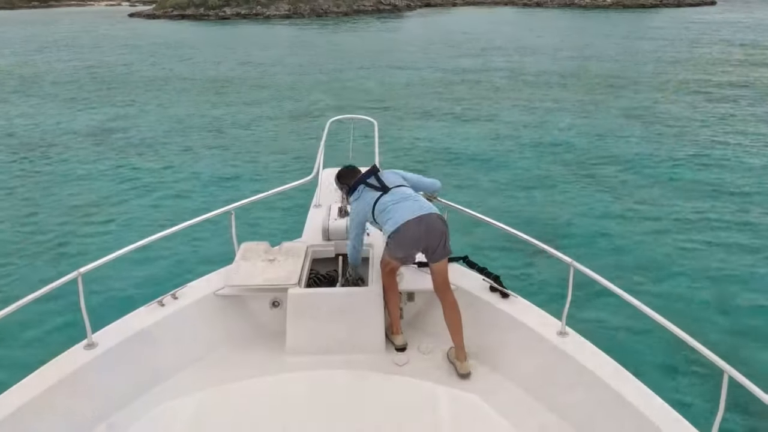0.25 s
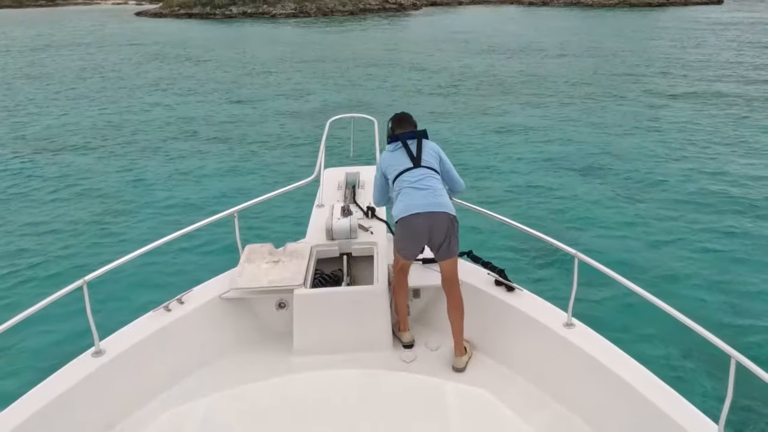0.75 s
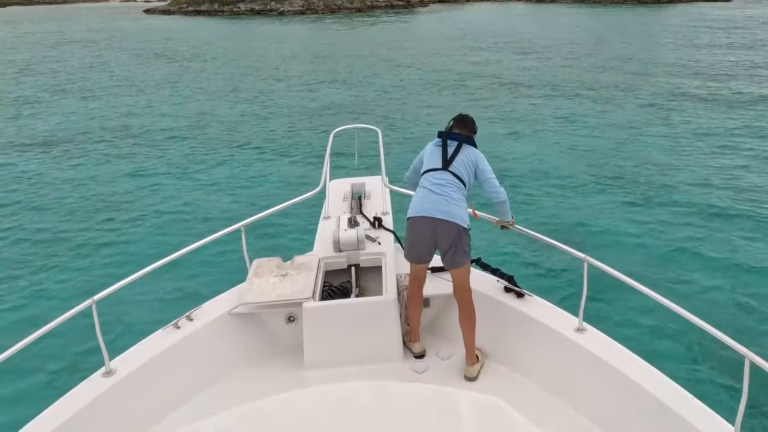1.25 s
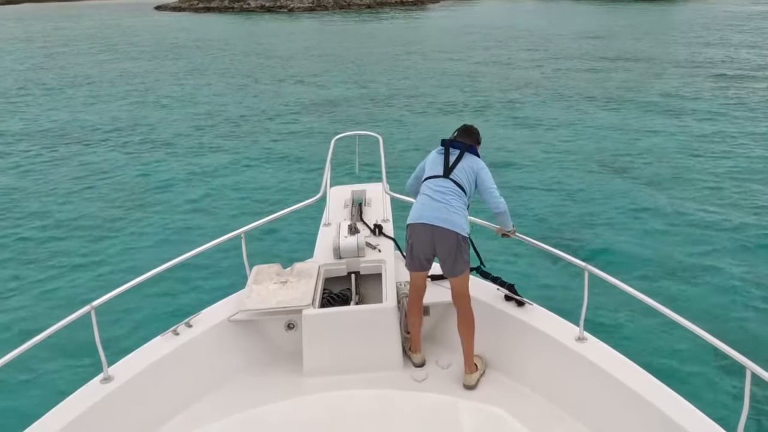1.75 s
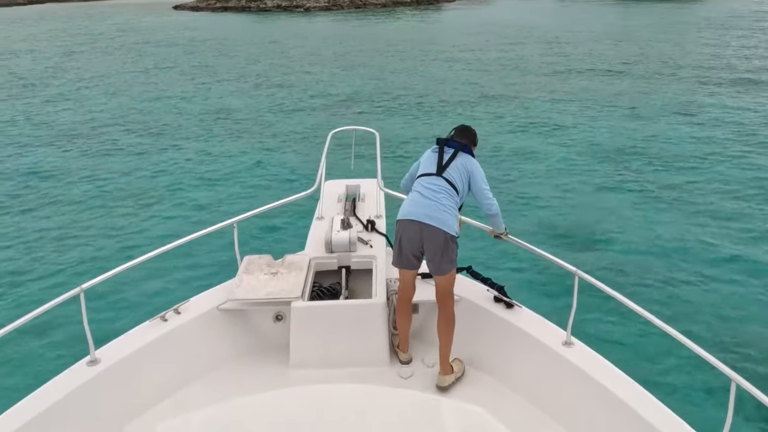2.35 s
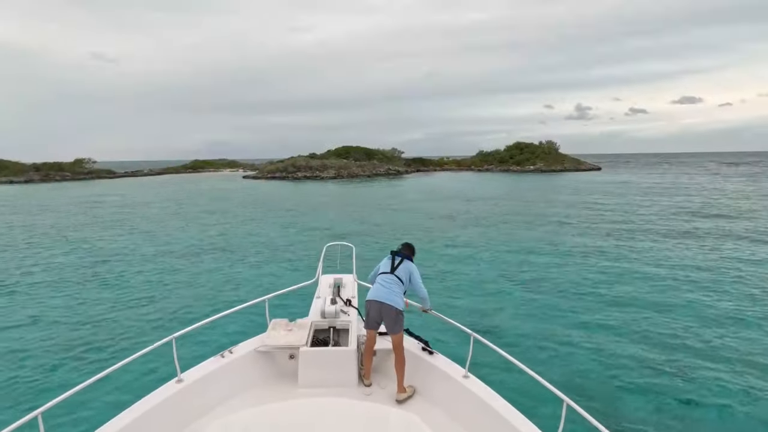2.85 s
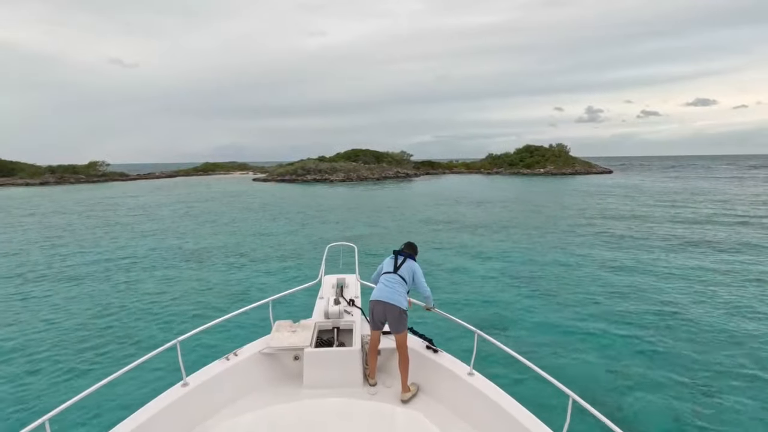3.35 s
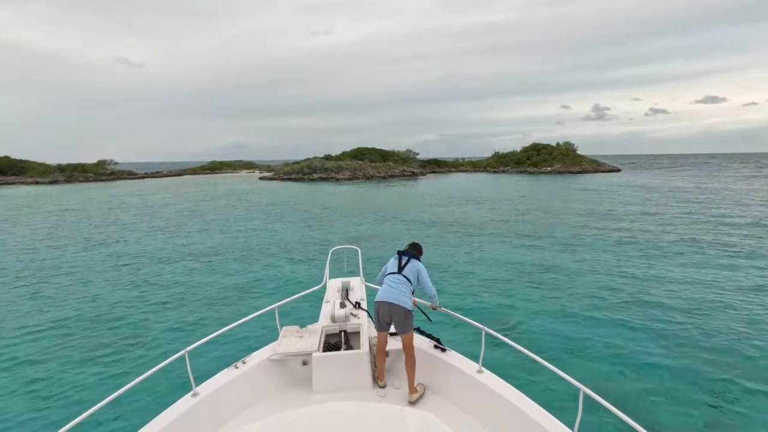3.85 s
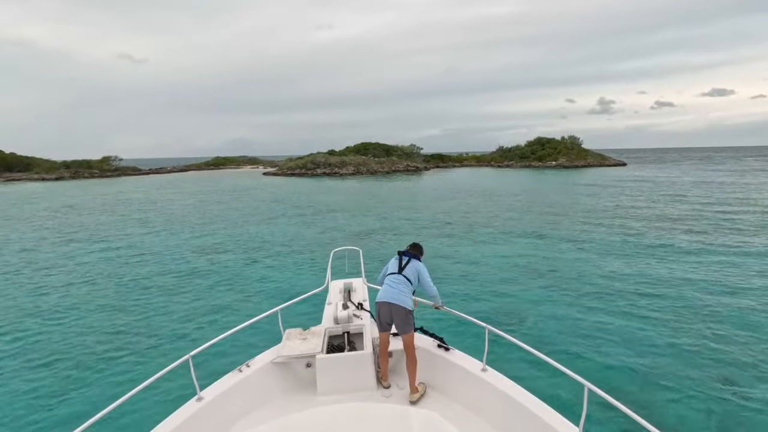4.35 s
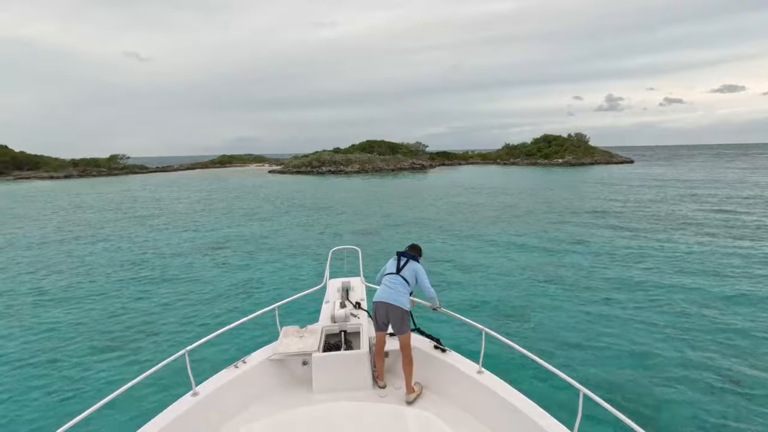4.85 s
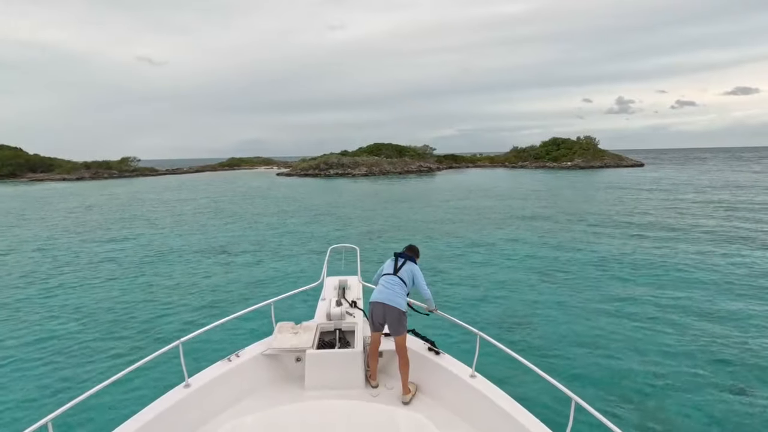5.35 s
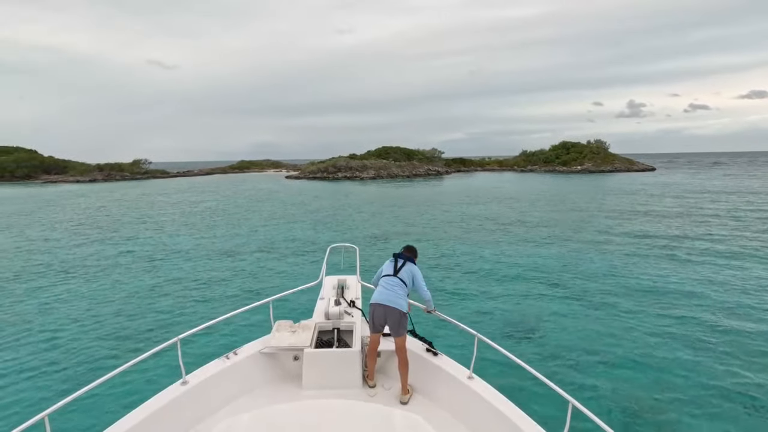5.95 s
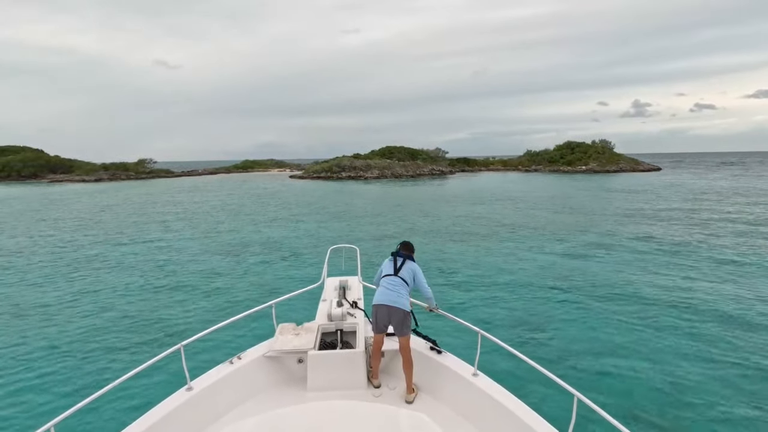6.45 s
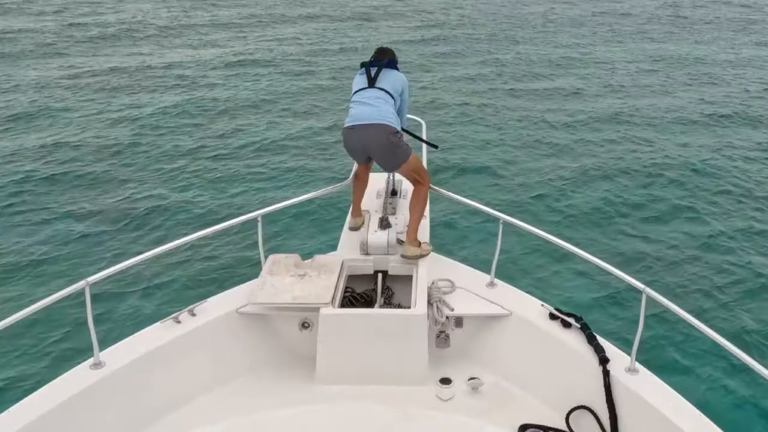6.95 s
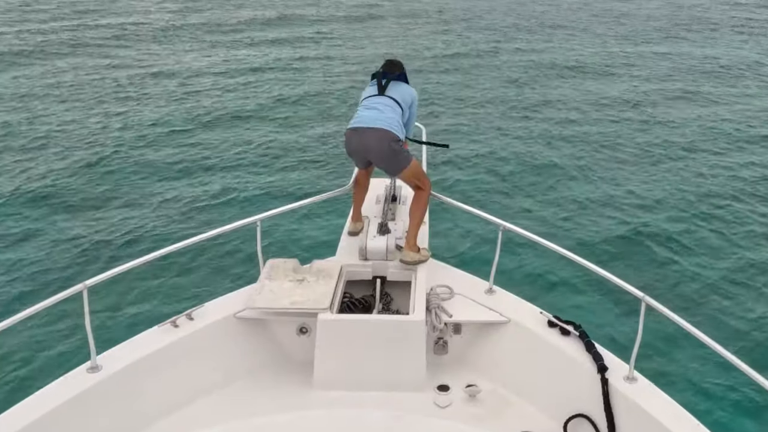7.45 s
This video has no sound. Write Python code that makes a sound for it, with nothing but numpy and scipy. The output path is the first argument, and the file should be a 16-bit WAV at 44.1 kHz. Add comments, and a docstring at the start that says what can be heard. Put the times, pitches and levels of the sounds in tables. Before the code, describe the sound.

Open air on a small motor boat's bow, heard close to the chain. At 0 s slack steel links drop with a sharp clank and tumble briefly, with a smaller shift near 0.3 s. Until 1.86 s only low idling engines, beating slowly, wind rumble and soft sea wash remain. Then the windlass clunks and takes up the chain: clacks settle to eight or nine per second, over dense metallic rattle, fine high jingle, a wavering gear hum and hollow deck boom. Heavier bumps come around 2.4 s, an engine swell near 3 s, and loose slumps at 4.3-5 s. Around 6.1-6.3 s a wind buffet, deck thud and ringing chinks mark the end. The rattle weakens and stops at 6.5 s. Hollow thumps stumble at 6.76-6.9 s and again near 7.4 s, amid wind buffets, wash and a faint rising rustle until 7.7 s.

```python
"""Anchor windlass on a small motor boat

An electric windlass hauls chain: links clack into the chain wheel eight or nine times a second (noise bursts),
rattle over the roller (random touches through steel modes) and slump in the locker; the deck drones.
Hollow thumps (filtered pulses) follow the stop. Beneath: two idling engines (beating sines),
sea wash and wind (coloured noise), with brief buffets on the microphone."""
import sys
import numpy as np
from scipy import signal
from scipy.fft import rfft, irfft
from scipy.io import wavfile

SR = 44100
rng = np.random.default_rng(int(sys.argv[2]) if len(sys.argv) > 2 else 0)


def pcm_store(signal):
    """Save signal as 16-bit PCM."""
    levels = np.round(np.clip(np.atleast_2d(signal), -1, 1) * 32767)
    wavfile.write(sys.argv[1], SR, levels.astype(np.int16).T)


N = 340050
START_S, STOP_S = 1.8597, 6.53
TAKE_UP_S, RUN_DOWN_S = 0.096, 0.031


def from_db(db):
    """Decibels to amplitude gain."""
    return 10 ** (np.asarray(db) / 20)


def rms_one(x):
    """Scale to unit rms."""
    return x / np.sqrt(np.mean(x ** 2) + 1e-20)


def in_time(rows):
    """Interpolate each column of a time curve to every sample."""
    s, *columns = np.transpose(rows)
    return [np.interp(np.arange(N) / SR, s, column) for column in columns]


def drift(rate_hz):
    """Slow random curve of unit rms: two-pole low-passed noise, computed every 40 samples."""
    step = 40
    r = np.exp(-2 * np.pi * step * rate_hz / SR)
    noise = rng.standard_normal(N // step + 2002)
    slow = signal.lfilter([1], [1, -2 * r, r * r], noise)[2000:]  # drop the settling
    return np.interp(np.arange(N) / step, np.arange(len(slow)), rms_one(slow))


def colour(x, spectrum):
    """Minimum-phase filter with the given spectrum and unit power gain."""
    size = 8192
    hz, db = np.transpose(spectrum)
    grid_hz = np.maximum(np.arange(size // 2 + 1) * SR / size, 1)
    grid_db = np.interp(np.log(grid_hz), np.log(hz), db)
    cepstrum = irfft(np.log(from_db(grid_db)))
    response = irfft(np.exp(rfft(2 * cepstrum[:size // 2], size)))  # folded cepstrum: causal
    return signal.oaconvolve(x, response / np.linalg.norm(response))[:N]


def contacts(per_s, spread_db):
    """Random touches of uneven strength and sign, at unit rms."""
    size_db = spread_db * np.minimum(rng.exponential(1, N), 3)
    sizes = from_db(size_db) * rng.choice([-1, 1], N)
    return rms_one(sizes * (rng.random(N) < per_s / SR))


def add(track, s, sound):
    """Mix a short sound in at time s."""
    start = int(np.clip(s * SR, 0, N - 1))
    track[start:start + len(sound)] += sound[:N - start]


def crack(t60_s):
    """Noise burst with exponential decay."""
    t = np.arange(SR // 4) / SR
    return rng.standard_normal(len(t)) * from_db(-60 * t / t60_s)


def spread(force, t60_s, tail_db):
    """Each touch falls on one of six spots, each with its own short dense ring."""
    spots = rng.integers(0, 6, N)
    out = force.copy()
    for k in range(6):
        tail = crack(t60_s)
        tail /= np.linalg.norm(tail)
        out += from_db(tail_db) * signal.oaconvolve(force * (spots == k), tail)[:N]
    return out / np.sqrt(1 + from_db(2 * tail_db))


def ring(force, hz, t60_s):
    """One resonant mode, with unit power gain."""
    r, w = from_db(-60 / (t60_s * SR)), 2 * np.pi * hz / SR
    gain = np.sqrt(2 * (1 - r * r)) * np.sin(w)
    return signal.lfilter([0, gain], [1, -2 * r * np.cos(w), r * r], force + 1e-18)


# Modes of steel links and wheel: (frequency [Hz], level [dB])
STEEL_MODES = [(1138, -11), (1225, -17), (1355, -11.5), (1815, -12), (1865, -17), (2015, -17.5),
               (2398, -13.5), (2935, -15), (3285, -16), (3576, -20), (4135, -21), (4540, -23),
               (4615, -22.5)]


def steel(force, t60_s=0.1):
    """Touches excite the steel modes, each with its own slowly varying strength."""
    return sum(from_db(db) * ring(force * from_db(2.75 * drift(12.0)), hz, t60_s) for hz, db in STEEL_MODES)


def link_ring(hz, t60_s):
    """One link rings in two modes until its neighbours damp it."""
    t = np.arange(SR // 10) / SR
    phase = 2 * np.pi * hz * t
    attack = np.minimum(t / .0015, 1)
    modes = np.sin(phase) + from_db(-16) * np.sin(1.61 * phase)
    return attack * modes * from_db(-60 * t / t60_s)


def motor_on():
    """Gate: ramps from 0 to 1 at the start and back at the stop."""
    return in_time([(START_S - RUN_DOWN_S, 0), (START_S + TAKE_UP_S, 1),
                    (STOP_S - RUN_DOWN_S, 1), (STOP_S + RUN_DOWN_S, 0)])[0]


# Slack chain slumping onto the heap: (time [s], level [dB], length [s])
SLUMPS = [(0.0, -16.5, 0.017), (0.026, -34, 0.032), (0.057, -25.5, 0.093), (0.244, -24.5, 0.023),
          (0.32, -38, 0.059), (2.038, -23.5, 0.019), (2.061, -30, 0.07), (2.881, -27, 0.087),
          (2.973, -28.5, 0.068), (3.757, -24.5, 0.022), (4.305, -18, 0.032), (4.467, -20, 0.016),
          (4.721, -18.5, 0.016), (4.957, -19.5, 0.02), (5.732, -25.5, 0.04), (5.967, -24, 0.016),
          (6.147, -26, 0.018), (6.23, -24, 0.025), (6.422, -25.5, 0.012)]
# Slump spectrum: (frequency [Hz], density [dB per Hz])
SLUMP_COLOUR = [(250, 5), (600, -3.5), (900, -3), (1400, -3), (1850, -4.5), (2350, -2), (2750, -7.5),
                (4000, -9.5), (7000, -39.5), (15000, -43)]
# Hollow boom of deck and locker: (frequency [Hz], density [dB per Hz])
DECK_COLOUR = [(120, -7), (220, -1.5), (270, 7), (350, -10.5), (400, 1), (560, -1), (680, -9.5),
               (780, -12.5), (1000, -8.5), (1600, -27), (4000, -56)]


def slumps(slump_db=-9.0, ring_db=-8.5, boom_db=-5.0):
    """Links tumble in a thinning shower of touches; the steel rings and the locker booms."""
    force, t = np.zeros(N), np.arange(SR // 3) / SR
    touches = contacts(per_s=1100, spread_db=0)
    attack = np.minimum(t / .008, 1)
    for s, db, length_s in SLUMPS:
        start = int(max(s, 0) * SR)
        envelope = attack / (1 + (t / length_s) ** 4)
        shower = touches[start:start + len(t)] * envelope
        add(force, s, from_db(db + slump_db) * shower)
    force = spread(force, t60_s=0.028, tail_db=-5)
    boom = from_db(boom_db) * colour(force, DECK_COLOUR)
    return colour(force, SLUMP_COLOUR) + from_db(ring_db) * steel(force) + boom


# Twin idling engines: (time [s], firing rate [Hz], level [dB], second engine's share [ratio])
ENGINE = [(0, 34.62, -23, 0.99), (1.3, 34.1, -23, 0.15), (2.3, 34.81, -23.5, 0.55),
          (3.05, 34.53, -16.5, 0.13), (3.4, 37.75, -25.5, 0.048), (4.5, 40.58, -26, 0.055),
          (6, 38.07, -29.5, 0.052), (7.7, 42.37, -30, 0.15)]


def engine(second_db=-16.0, third_db=-26.0, beat_hz=2.32, beat_peak_s=.39):
    """Two firing tones beat against each other; the hull carries them with faint overtones."""
    hz, db, share = in_time(ENGINE)
    first = 2 * np.pi * np.cumsum(hz * (1 + .02 * drift(4))) / SR
    second = first + 2 * np.pi * beat_hz * (np.arange(N) / SR - beat_peak_s)
    orders = enumerate(from_db([0, second_db, third_db]), 1)
    tone = sum(gain * (np.sin(k * first) + share * np.sin(k * second)) for k, gain in orders)
    return np.sqrt(2) * from_db(db + 1.8 * drift(4.3)) * tone


def thin_hum(hum_db=-58):
    """Noise through one narrow resonance: a faint wavering tone."""
    return from_db(hum_db) * ring(rng.standard_normal(N), hz=678, t60_s=0.25)


# Wind level: (time [s], level [dB])
WIND = [(0, -29), (.7, -34), (1.4, -27.5), (2.6, -30.5), (6.05, -24.5), (6.45, -31), (6.8, -22), (7.7, -27)]
# Wind spectrum: (frequency [Hz], density [dB per Hz])
WIND_COLOUR = [(12, -4.5), (28, -4), (72, 0), (120, -6), (200, -14), (320, -19), (700, -35), (15000, -125)]


def wind():
    """Low-coloured noise: a rumble on the microphone that swells and sinks."""
    db, = in_time(WIND)
    return from_db(db) * colour(rng.standard_normal(N), WIND_COLOUR)


# Sea wash level: (time [s], level [dB])
SEA = [(.5, -42.5), (1.1, -42.5), (1.6, -41.5), (6.65, -38.5), (7.25, -45.5), (7.7, -39)]
# Sea wash spectrum: (frequency [Hz], density [dB per Hz])
SEA_COLOUR = [(100, 5), (250, -3.5), (600, -6), (1100, -13.5), (2000, -21.5), (3300, -27), (5000, -36.5),
              (7000, -45.5), (10000, -53), (15000, -81.5)]


def sea():
    """Ripples wash softly around the hull: coloured noise on a level curve."""
    db, = in_time(SEA)
    return from_db(db) * colour(rng.standard_normal(N), SEA_COLOUR)


# Showers of light touches: (middle [s], level [dB], half length to 1/e [s])
SHOWERS = [(0.082, -57, 0.067), (0.372, -64, 0.022), (0.45, -69, 0.033), (2.947, -61, 0.094),
           (3.816, -55, 0.013), (5.35, -59.5, 0.2), (6.117, -67, 0.074)]
# Jingle spectrum: (frequency [Hz], density [dB per Hz])
JINGLE_COLOUR = [(3000, -30), (6300, 2), (7300, -5.5), (9700, -1), (11200, -15.5), (12500, -5),
                 (15000, -23)]


def jingle(below_rattle_db=-28):
    """Light touches ring only at the very top, steadily while hauling and in a few showers."""
    t = np.arange(N) / SR
    level = motor_on() * from_db(in_time(HAUL)[0] + below_rattle_db)
    for s, db, length_s in SHOWERS:
        level += from_db(db) * np.exp(-((t - s) / length_s) ** 2)
    force = contacts(per_s=400, spread_db=2.5)
    return level * colour(spread(force, t60_s=0.062, tail_db=6.0), JINGLE_COLOUR)


# Heavy bumps of chain on deck: (time [s], level [dB])
BUMPS = [(0.065, -26), (2.264, -29.5), (2.378, -22), (2.826, -27), (6.097, -24)]


def bumps(t60_s=0.047):
    """Now and then the chain thuds into the deck: decaying noise in the deck's colour."""
    out = np.zeros(N)
    for s, db in BUMPS:
        add(out, s, from_db(db) * crack(t60_s))
    return colour(out, DECK_COLOUR)


# Gusts on the microphone: (time [s], level [dB], half length to 1/e [s], top edge [Hz])
BUFFETS = [(1.59, -23, .03, 200), (6.06, -19, .04, 170), (6.88, -24.5, .035, 620), (7.264, -27, .008, 480),
           (7.42, -25, .045, 330)]


def buffets():
    """Brief eddies thump on the microphone: noise swells, each with its own top edge."""
    out, t = np.zeros(N), np.arange(-SR // 10, SR // 10) / SR
    for s, db, length_s, top_hz in BUFFETS:
        spectrum = [(top_hz / 12, -10), (top_hz / 4, 0), (top_hz / 2, 0),
                    (top_hz, -6), (2 * top_hz, -23), (40 * top_hz, -100)]
        swell = np.exp(-(t / length_s) ** 2)
        eddy = swell * colour(rng.standard_normal(len(t)), spectrum)[:len(t)]
        eddy *= np.linalg.norm(swell) / np.linalg.norm(eddy)  # same energy as the swell
        add(out, s + t[0], from_db(db) * eddy)
    return out


# Chain over the roller: (time [s], rattle level [dB], deck level [dB])
HAUL = [(1.9, -48.5, -27.5), (2.07, -39.5, -44.5), (3.3, -38, -34.5), (3.96, -36.5, -31), (5.71, -36, -37),
        (6.27, -38.5, -23.5), (6.39, -49.5, -35)]
# Rattle spectrum: (frequency [Hz], density [dB per Hz])
RATTLE_COLOUR = [(350, 1), (600, 5), (780, -8), (1130, 2.5), (1550, -1.5), (2200, -1), (2600, -6.5),
                 (2950, -2), (4500, -11), (5600, -17), (6400, -19), (7200, -30.5), (15000, -40)]


def running_chain(rattle_db=-3.5, ring_db=-7.0, deck_db=-5.5):
    """Links jostle over the roller in bunches; the same touches boom in the hollow deck."""
    level_db, boom_db = in_time(HAUL)
    bunching = from_db(1.5 * drift(25))
    force = motor_on() * bunching * contacts(per_s=420, spread_db=3)
    shake = spread(force, t60_s=0.11, tail_db=6.0)
    rattle = from_db(rattle_db) * colour(shake, RATTLE_COLOUR) + from_db(ring_db) * steel(force)
    boom = colour(spread(force, t60_s=0.038, tail_db=5.0), DECK_COLOUR)
    return from_db(level_db) * rattle + from_db(boom_db + deck_db) * boom


def clinks(clink_db=-15.5, t60_s=0.032, per_s=500):
    """Jostling links give dense short clinks at random pitches, as their neighbours hold them."""
    out = np.zeros(N)
    level = motor_on() * from_db(in_time(HAUL)[0] + clink_db)
    haul_s = STOP_S - START_S
    for when, pitch, strength in rng.random((int(per_s * haul_s), 3)):
        s = START_S + when * haul_s
        hz = 500 * 10 ** pitch  # 500 to 5000 Hz
        add(out, s, level[int(s * SR)] * from_db(10 * strength) * link_ring(hz, t60_s))
    return colour(out, RATTLE_COLOUR)


def start_clunk(clunk_db=-27.0, hz=590, t60_s=0.083):
    """The housing rings once as the drive takes up the slack: a decaying sine."""
    out, t = np.zeros(N), np.arange(SR // 4) / SR
    add(out, START_S, from_db(clunk_db - 60 * t / t60_s) * np.sin(2 * np.pi * hz * t))
    return out


# Links meeting the chain wheel: (time [s], level [dB])
LINKS = [(1.86, -40), (2.005, -44), (2.132, -33), (2.261, -30.5), (2.376, -36.5), (2.473, -40),
         (2.594, -34), (2.705, -34), (2.817, -32), (2.931, -32.5), (3.046, -31), (3.157, -32.5),
         (3.269, -32.5), (3.385, -31), (3.5, -34.5), (3.612, -31.5), (3.728, -32), (3.845, -30),
         (3.959, -30.5), (4.069, -32), (4.187, -30.5), (4.303, -29), (4.419, -30.5), (4.535, -30),
         (4.651, -35), (4.768, -33.5), (4.888, -30.5), (5.003, -29), (5.124, -30.5), (5.24, -33),
         (5.36, -27.5), (5.476, -33), (5.595, -31), (5.714, -33.5), (5.838, -33), (5.96, -32),
         (6.082, -31.5), (6.208, -31), (6.342, -35.5), (6.472, -35.5)]
# Lag of a link's seating: (time [s], delay [s])
SEATING = [(4.0, 0.01), (5.6, 0.02), (6.22, 0.024), (6.33, 0.0079)]
# Click spectrum: (frequency [Hz], density [dB per Hz])
CLICK_COLOUR = [(500, -2), (2300, -6.5), (3000, 4.5), (4600, -5), (5500, -13), (6400, -14), (7400, -23.5),
                (12500, -33.5), (15000, -43)]


def chain_wheel(click_db=1.65, seat_db=-6.5, grind_db=-5.5, knock_db=-28.5, knock_follows=0.8,
                ring_db=-7.5, click_t60_s=0.031, knock_t60_s=0.13, knock_lag_s=0.008):
    """Each link clicks on the wheel, grinds into its pocket and knocks the deck, harder under load."""
    clicks, grinds, knocks = np.zeros((3, N))
    load_db = in_time(HAUL)[0] - np.max(np.array(HAUL)[:, 1])  # rattle level stands for load
    for s, db in LINKS:
        seated_s = s + np.interp(s, *np.transpose(SEATING))
        for at_s, touch_db in (s, db), (seated_s, db + seat_db):
            tick = np.sqrt(2) * crack(0.0013)  # hard steel-on-steel onset
            add(clicks, at_s, from_db(touch_db + click_db) * (tick + crack(click_t60_s)))
        add(grinds, seated_s, from_db(db + grind_db) * crack(2 * click_t60_s))
        blow_db = knock_db + knock_follows * load_db[int(s * SR)] + rng.standard_normal()
        add(knocks, seated_s + knock_lag_s, from_db(blow_db) * crack(knock_t60_s))
    touches = colour(clicks, CLICK_COLOUR) + colour(grinds, RATTLE_COLOUR)
    return touches + from_db(ring_db) * steel(clicks + grinds) + colour(knocks, DECK_COLOUR)


def gear_hum(hum_db=-6.0, wobble=0.0355, flutter_db=6.0, cycles_per_link=29.7):
    """A sine follows the link rate and the rattle level; its pitch and level waver at random."""
    link_s = np.array(LINKS)[:, 0]
    links_per_s = np.interp(np.arange(N) / SR, link_s, 1 / np.gradient(link_s))
    db, _ = in_time(HAUL)
    hz = cycles_per_link * links_per_s * (1 + wobble * drift(19.7))
    phase = 2 * np.pi * np.cumsum(hz) / SR
    level = from_db(db + hum_db + flutter_db * drift(14.5))
    return np.sqrt(2) * motor_on() * level * np.sin(phase)


# Free links chinking together: (time [s], level [dB], pitch [Hz])
CHINKS = [(3.125, -33, 3235), (4.216, -33, 4540), (6.234, -28, 2570), (6.3, -28, 1085), (6.788, -50, 4570),
          (6.815, -54, 4530)]


def chinks(t60_s=0.059):
    """Now and then a free link rings out in two decaying modes."""
    out = np.zeros(N)
    for s, db, hz in CHINKS:
        add(out, s, from_db(db) * link_ring(hz, t60_s))
    return out


def rustle(rustle_db=-63):
    """A soft high rustle of coloured noise swells at the end."""
    swell = np.exp(-((np.arange(N) - N) / SR / .5) ** 2)
    return swell * from_db(rustle_db + 2 * drift(10)) * colour(rng.standard_normal(N), CLICK_COLOUR)


def dry_tick(tick_s=6.7545, tick_db=-36):
    """One tiny noise tick after the stop, without any ring."""
    out = np.zeros(N)
    add(out, tick_s, from_db(tick_db) * crack(0.0016))
    return out


# Hollow thumps close by: (time [s], peak level [dB], top edge [Hz])
THUMPS = [(6.7595, -19, 900), (6.7635, -15, 1300), (6.768, -14, 1900), (6.781, -20, 450), (6.788, -16, 650),
          (6.844, -19, 1200), (6.883, -21, 750), (6.904, -21, 750), (7.379, -20, 750), (7.391, -16, 500),
          (7.396, -17, 1200), (7.401, -12, 1500)]
# Thump spectrum: (frequency [Hz], density [dB per Hz])
THUMP_COLOUR = [(150, -6.5), (335, 8.5), (560, -3), (720, 5), (1120, -7), (1280, 0), (1420, -16),
                (1600, -8.5), (2700, -12.5)]


def thumps(thump_db=1.0, tail_db=-27, t60_s=0.032):
    """Low-passed pulses with noise tails: short hollow thumps in two stumbling runs."""
    out = np.zeros(N)
    for s, db, top_hz in THUMPS:
        push = from_db(tail_db) * crack(t60_s)
        push[0] = 1
        low_pass = signal.butter(3, top_hz, fs=SR, output="sos")
        thump = colour(signal.sosfilt(low_pass, push), THUMP_COLOUR)
        add(out, s, from_db(db + thump_db) * thump / np.abs(thump).max())
    return out


def scene():
    """The windlass on the open deck, over engine, wind and water."""
    chain = slumps() + jingle() + bumps() + running_chain() + clinks() + chinks()
    windlass = start_clunk() + chain_wheel() + gear_hum()
    surroundings = engine() + thin_hum() + wind() + sea() + buffets()
    after_stop = rustle() + dry_tick() + thumps()
    return (chain + windlass + surroundings + after_stop)[None]


def record(dry):
    """Close with a 5 ms fade, then cut the top steeply at 15 kHz."""
    fade = np.minimum(np.arange(N)[::-1] / (.005 * SR), 1)
    top_cut = signal.cheby2(12, 60, 15000, fs=SR, output="sos")
    return signal.sosfilt(top_cut, dry * fade)


dry = scene()
out = record(dry)
pcm_store(out)
```